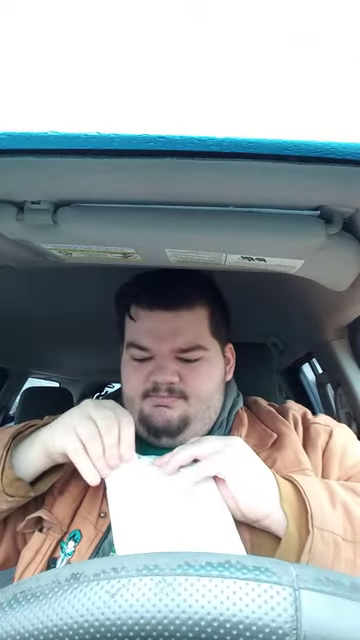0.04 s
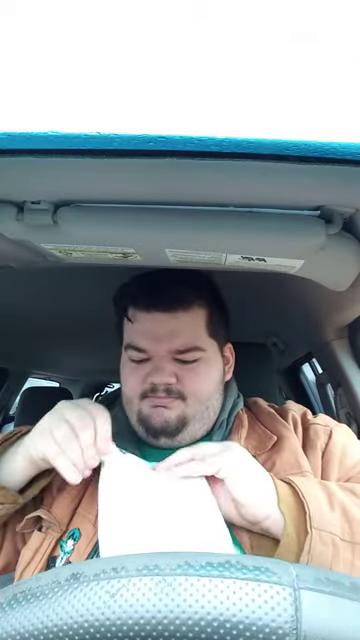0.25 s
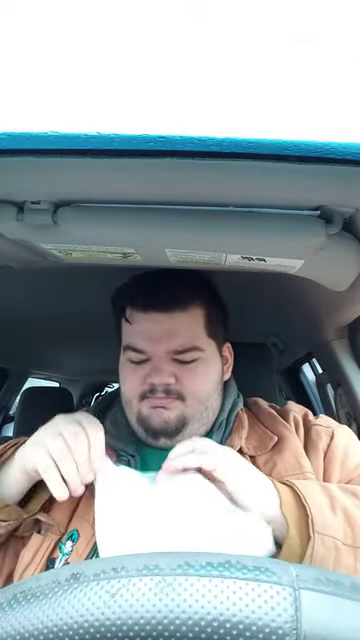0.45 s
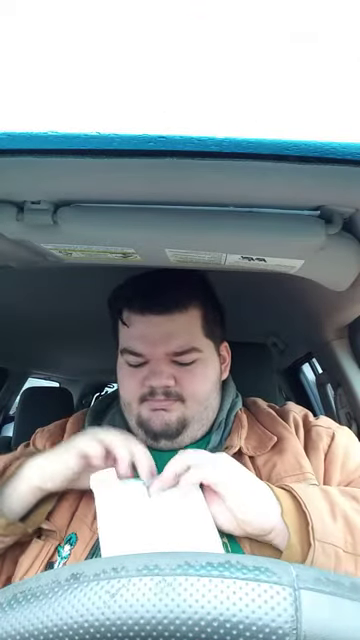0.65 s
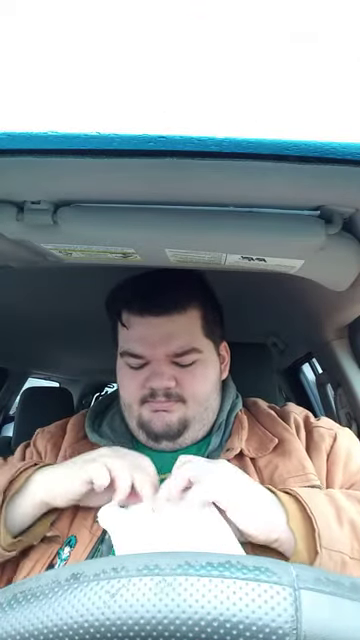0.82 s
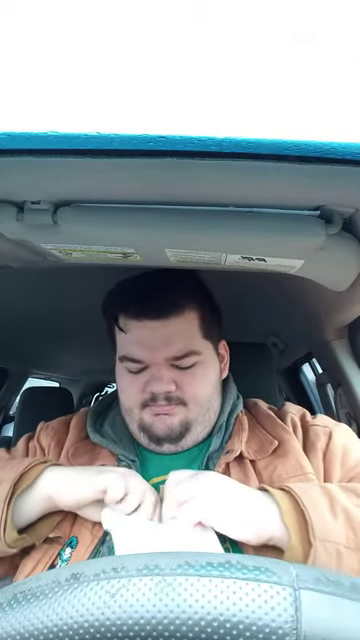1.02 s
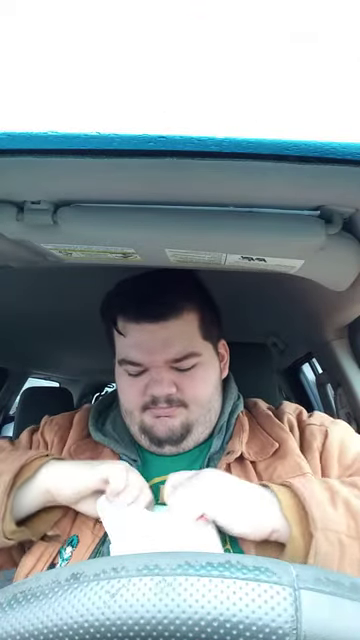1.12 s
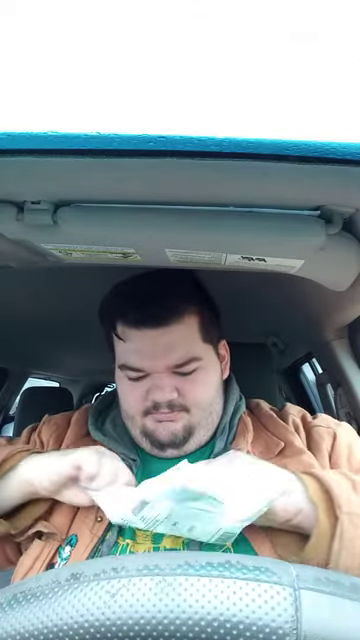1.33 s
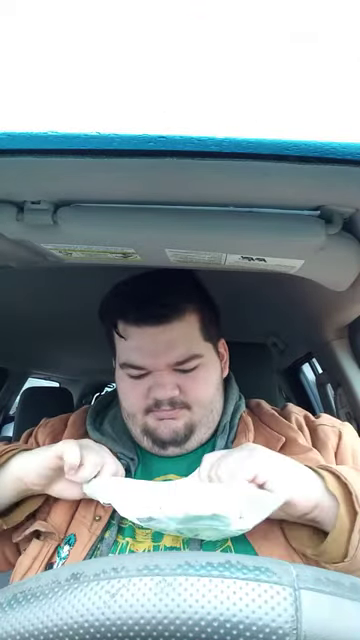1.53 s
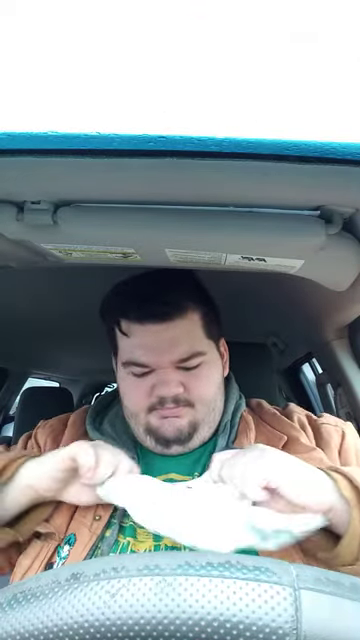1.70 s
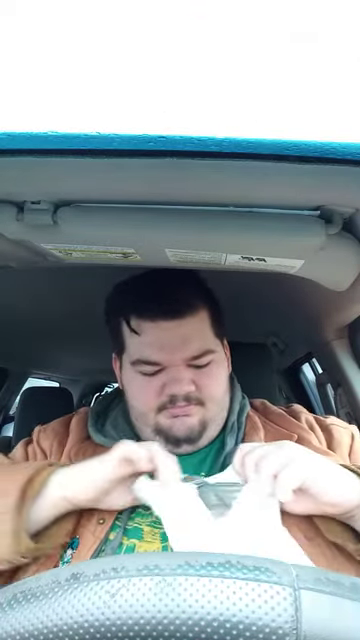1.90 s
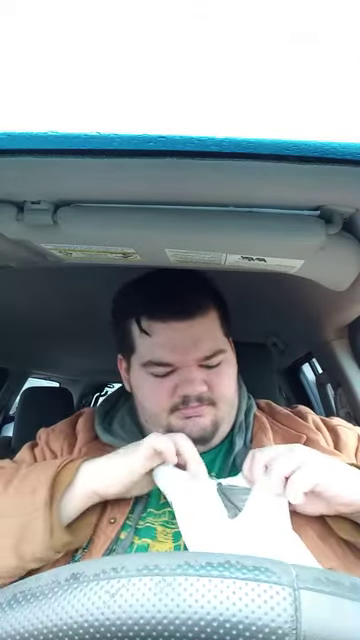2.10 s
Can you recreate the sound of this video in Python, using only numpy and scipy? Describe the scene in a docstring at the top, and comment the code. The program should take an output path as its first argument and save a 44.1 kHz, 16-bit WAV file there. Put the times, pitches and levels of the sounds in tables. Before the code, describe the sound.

Hands handle and rip a paper envelope, with sharp creases popping over fine crackle and soft low flaps of the sheet. A strong early snap, denser crumpling midway, quieter ending; close and dry inside a parked car, mono.

```python
"""Paper envelope torn in a parked car

Mono, inside the small padded cabin of a parked car: hands tear and crumple a stiff paper envelope.
Creases buckle in sharp snaps, bursts of noise around a broad ring, smeared by the quick echoes of
glass and dashboard. Fine crackle, hundreds of small cracks a second, follows the effort of the hands.
The sheet flaps with low puffs of noise over a soft rustle; a faint murmur of air comes from outside."""
import sys
import numpy as np
from scipy import signal
from scipy.fft import rfft, irfft
from scipy.io import wavfile

SR = 44100
rng = np.random.default_rng(int(sys.argv[2]) if len(sys.argv) > 2 else 0)


def bounce(signal):
    """Save signal as a 16-bit WAV file at the path given by the first command-line argument."""
    frames = np.transpose(np.atleast_2d(signal))
    limited = np.clip(frames, -1, 1)
    pcm = np.round(limited * 32767).astype(np.int16)
    wavfile.write(sys.argv[1], SR, pcm)


def voltage_ratio(level):
    """Linear amplitude factor for a level in decibels (scalar or array-like)."""
    return 10 ** (np.asarray(level, float) / 20)


N = 94815  # samples in the scene

# Creases that buckle. Each row: start in seconds, peak level in dB, body gain in dB and treble gain
# in dB, both gains before the fixed lifts below.
CREASE_SNAPS = [(0.0014, -25, -5.5, -37), (0.0156, -27.5, -26, 5), (0.0419, -29.5, -7, -38),
                (0.072, -33.5, 8, 9), (0.1144, -29, -20, -8), (0.1285, -26, -7.5, -15),
                (0.184, -25.5, -6, -16), (0.1964, -26.5, -24, -2), (0.218, -18.5, -15, -19),
                (0.231, -7.5, -5, -30), (0.2354, -11.5, -18, -27), (0.2488, -5, -8.5, -17.5),
                (0.2651, -16.5, -22, -10), (0.2761, -17, -6, -28), (0.3076, -24.5, -27, -18),
                (0.3295, -37, -6, -30), (0.3701, -40.5, -39, -2), (0.3863, -37, -39, -23),
                (0.4208, -27, -16, -53), (0.44, -25, -15.5, -27), (0.491, -29, -14, -28),
                (0.5528, -39.5, -27, -19), (0.587, -23, -17.5, -11), (0.627, -17.5, -6.5, -22),
                (0.644, -22.5, -9.5, -8), (0.6609, -34.5, 17, -16), (0.6863, -21.5, -7, -23),
                (0.699, -22, -5.5, -38), (0.7434, -27, -3, -34), (0.7623, -20.5, -12.5, -21),
                (0.7728, -20.5, -4, -29), (0.867, -28.5, -46, -32), (0.939, -17.5, -20, -20),
                (0.9704, -25.5, -14.5, -14), (1.0254, -24.5, -9, -9), (1.0556, -16.5, -6, -18),
                (1.1161, -15, -6.5, -39), (1.1229, -22, 7, -37), (1.1458, -21, 12, -33),
                (1.1612, -15.5, 0, -24), (1.1737, -23.5, -22, 6), (1.1867, -19, -11, -32),
                (1.2033, -19, 8, -30), (1.2135, -16.5, -7, -18), (1.2337, -23.5, -8, -34),
                (1.263, -18, -12, -13), (1.299, -44, -11, -25), (1.3495, -16, -9, -33),
                (1.364, -20, -2, -39), (1.377, -13.5, -12.5, -16), (1.3916, -22, -41, -14),
                (1.4188, -19.5, -5.5, -37), (1.4352, -20, -35, -7), (1.5022, -16, -11, -19),
                (1.5179, -17.5, -41, -15), (1.6143, -21, -27, -35), (1.658, -28.5, -6, -7),
                (1.6902, -24.5, -6, -24), (1.711, -19.5, -6, -18), (1.761, -25, -10.5, -20),
                (1.7998, -30.5, 6, -19), (1.818, -37, -16, 10), (1.8271, -28.5, 0, -40),
                (1.838, -30, -12.5, -17), (1.8457, -31.5, -10, 0), (1.8661, -29, -3, -9),
                (1.8762, -30, -6, -30), (1.885, -23.5, -6.5, -19), (1.9243, -27.5, -7, -15),
                (1.9368, -21, -10.5, -6.5), (1.98, -30.5, -4, -16), (2.0567, -30, -5.5, -18),
                (2.1028, -25, -3, -23), (2.1261, -26.5, -6, -35)]
# The sheet flaps and pushes air. Each row: start in seconds, peak level in dB.
SHEET_FLAPS = [(0.066, -39), (0.228, -19.5), (0.272, -33.5), (0.599, -33.5), (0.682, -31.5), (0.924, -39.5),
               (1.05, -34), (1.134, -33), (1.205, -31), (1.324, -37.5), (1.418, -32), (1.5, -40),
               (2.129, -51.5)]
# Effort of the hands. Each row: time in seconds, crackle level in dB, low rustle level in dB.
HAND_EFFORT = [(0, -47.5, -57.5), (.17, -52.5, -56), (.22, -41.5, -56), (.29, -36.5, -43),
               (.34, -58.5, -71.5), (.54, -55.5, -59), (.59, -39.5, -59.5), (.72, -50, -47.5),
               (.82, -39, -53.5), (.85, -55.5, -63), (.93, -36, -51.5), (1.0, -45.5, -49.5),
               (1.12, -33.5, -46.5), (1.3, -34, -47.5), (1.37, -33, -43.5), (1.6, -38, -56),
               (1.64, -56.5, -63.5), (1.68, -53.5, -62), (1.76, -43, -64), (1.9, -45, -55),
               (2.02, -51.5, -65.5), (2.15, -47, -49.5)]
# Paper, cabin and microphone together. Each row: frequency in Hz, relative spectrum level in dB per Hz.
PAPER_COLOUR = [(410, -32.5), (700, -27.5), (876, -9.5), (1340, -13), (1490, -1), (1890, -5.5), (2630, 2),
                (3160, -9.5), (4060, -6), (5880, -4), (10300, -18), (15900, -5.5), (16500, -78)]
# Air pushed by the sheet. Each row: frequency in Hz, relative spectrum level in dB per Hz.
AIR_COLOUR = [(53, -64), (90, -16.5), (250, -1), (493, 0), (642, -12.5), (800, -11.5), (1040, 2),
              (1760, -120)]

EVENT_SAMPLES = 5000  # length of one crack or puff
BODY_HZ, BODY_LIFT_DB = 2404, 6  # upper edge and lift of a crack's body
TREBLE_HZ, TREBLE_LIFT_DB = 8620, 3  # lower edge and lift of its tick


def in_time(rows):
    """Interpolates the columns of a timed table at every sample."""
    s, *columns = np.transpose(rows)
    return [np.interp(np.arange(N) / SR, s, column) for column in columns]


def rms_one(x):
    """Scales to rms 1."""
    return x / np.sqrt(np.mean(x ** 2) + 1e-20)


def peak_one(x):
    """Scales to peak 1."""
    return x / np.abs(x).max()


def passed(x, hz, kind, order=4):
    """Butterworth high-, low- or band-pass."""
    return signal.sosfilt(signal.butter(order, hz, kind, fs=SR, output="sos"), x)


def coloured(x, points):
    """Causal (minimum-phase) filter that follows a spectrum table."""
    hz, db = np.transpose(points)
    grid_hz = np.linspace(1, SR / 2, 2049)
    log_gain = np.log(voltage_ratio(np.interp(np.log(grid_hz), np.log(hz), db)))
    # Folding the cepstrum onto positive time makes the phase minimal
    cepstrum = irfft(log_gain)
    cepstrum[1:2048] *= 2
    cepstrum[2049:] = 0
    response = irfft(np.exp(rfft(cepstrum)))
    return signal.fftconvolve(x, response)[:len(x)]


def drift(rate_hz):
    """Slow chance: noise smoothed by two equal poles at the given rate, rms 1."""
    r = np.exp(-2 * np.pi * rate_hz / SR)
    slow = signal.lfilter([1], [1, -2 * r, r * r], rng.standard_normal(N + SR))
    return rms_one(slow[SR:])  # the first second lets the filter settle


def dying(rise_s, t60_s):
    """Envelope with a quick rise and an exponential fall of 60 dB in t60_s."""
    t = np.arange(EVENT_SAMPLES) / SR
    return (1 - np.exp(-t / rise_s)) * voltage_ratio(-60 * t / t60_s)


def place(events, sounds):
    """Lays each sound at its time and peak level."""
    out = np.zeros(N + EVENT_SAMPLES)
    for (s, db, *_), sound in zip(events, sounds):
        start = int(s * SR)
        out[start:start + EVENT_SAMPLES] += voltage_ratio(db) * sound
    return out[:N]


def outside_murmur():
    """Low murmur of air from outside the cabin: a narrow band of noise at -75 dB rms."""
    return voltage_ratio(-75) * rms_one(passed(rng.standard_normal(N), [129.95, 144.64], "band", order=2))


def flaps(rustle_db):
    """Air pushed by the sheet: decaying low noise for each flap, over a lumpy low rustle."""
    rise_s, t60_s = 0.0014, 0.064
    lump_db, lump_hz = 5.6, 4.2
    puffs = []
    for _ in SHEET_FLAPS:
        burst = rng.standard_normal(EVENT_SAMPLES) * dying(rise_s, t60_s)
        puffs.append(peak_one(coloured(burst, AIR_COLOUR)))
    lumps = voltage_ratio(lump_db * drift(lump_hz))
    rustle = rms_one(coloured(rng.standard_normal(N), AIR_COLOUR) * lumps)
    return place(SHEET_FLAPS, puffs) + voltage_ratio(rustle_db) * rustle


def crack(body_db, treble_db):
    """One buckling crease with its cabin echoes: broad ring, body below, tick above; peak 1."""
    rise_s, crack_t60_s, tick_t60_s = 0.0007, 0.022, 0.016  # the treble dies sooner
    cabin_t60_s, cabin_db, tick_cabin_db = 0.075, -12, -13
    width_share, skirt_db = 0.3, -9  # ring width over its pitch, and its broad part

    # The first sharp break of the fibres, the crack itself and the thicket of echoes
    white = rng.standard_normal(EVENT_SAMPLES)
    spike = dying(rise_s / 2, 0.004)
    echoes = dying(rise_s, cabin_t60_s)
    noise = white * (spike + dying(rise_s, crack_t60_s) + voltage_ratio(cabin_db) * echoes)
    tick_noise = white * (spike + dying(rise_s, tick_t60_s) + voltage_ratio(tick_cabin_db) * echoes)

    # Creases with more body ring lower, from 4800 down to 2900 Hz, with some scatter
    hz = np.interp(body_db, [-25, 0], [4800, 2900]) * np.exp(0.15 * rng.standard_normal())
    r = np.exp(-np.pi * width_share * hz / SR)
    poles = [1, -2 * r * np.cos(2 * np.pi * hz / SR), r * r]
    ring = signal.lfilter([(1 - r * r) / 2, 0, (r * r - 1) / 2], poles, noise)

    middle = passed(ring + voltage_ratio(skirt_db) * noise, BODY_HZ, "high", order=8)
    middle = passed(middle, TREBLE_HZ, "low")
    body = voltage_ratio(body_db + BODY_LIFT_DB) * passed(noise, BODY_HZ, "low")
    tick = voltage_ratio(treble_db + TREBLE_LIFT_DB) * passed(tick_noise, TREBLE_HZ, "high")
    return peak_one(coloured(middle + body + tick, PAPER_COLOUR))


def thinned(sound, level_db):
    """Under -50 dB of effort only small creases move: body and treble fade, 1.6 dB per dB."""
    thin = voltage_ratio(1.6 * np.minimum(level_db + 50, 0))
    upper = passed(sound, BODY_HZ, "high", order=8)
    ends = passed(sound, BODY_HZ, "low", order=8) + passed(upper, TREBLE_HZ, "high")
    return thin * ends + passed(upper, TREBLE_HZ, "low")


def crackle(level_db):
    """Small cracks at random, in clumps, of sixteen colours, over paper rubbing on paper."""
    base_per_s, size_spread_db, clump_db, clump_hz = 320, 2.5, 3, 25.0
    # More effort breaks more fibres: 0.35 dB of rate per dB
    denser_db = 0.35 * (level_db - level_db.mean())
    sizes = voltage_ratio(size_spread_db * np.minimum(rng.exponential(1, N), 3))
    born = rng.random(N) < base_per_s * voltage_ratio(clump_db * drift(clump_hz) + denser_db) / SR

    dealt = rng.integers(0, 16, N)  # which of the sixteen colours
    shares = [(body_db, treble_db) for body_db in (-36, -1, -5.5, -8.5)
              for treble_db in (-45, -30.5, -36, -11.0)]
    grains = np.zeros(N)
    for k, share in enumerate(shares):
        grains += signal.fftconvolve(sizes * born * (dealt == k), crack(*share))[:N]
    grains = rms_one(grains * voltage_ratio(-denser_db / 2))  # offsets the power of the denser cracks

    rub = passed(coloured(rng.standard_normal(N), PAPER_COLOUR), TREBLE_HZ, "low", order=1)
    sound = grains + voltage_ratio(-10.5) * rms_one(rub)
    return voltage_ratio(level_db) * thinned(sound, level_db)


def snaps():
    """Large creases that buckle suddenly, each a crack of its own body and treble."""
    cracks = [crack(body_db, treble_db) for _, _, body_db, treble_db in CREASE_SNAPS]
    return place(CREASE_SNAPS, cracks)


def scene():
    """Flaps, crackle and snaps inside the cabin, in one channel."""
    crackle_db, rustle_db = in_time(HAND_EFFORT)
    return (flaps(rustle_db) + crackle(crackle_db) + snaps())[None]


def low_pass(x):
    """Removes everything above the highest recorded frequency."""
    return signal.sosfilt(signal.butter(12, 17020, fs=SR, output="sos"), x)


def record(dry):
    """Adds the outside murmur and cuts the bass below 61 Hz."""
    heard = passed(dry + outside_murmur(), 61.0, "high", order=2)
    return low_pass(heard)


dry = scene()
out = record(dry)
bounce(out)
```